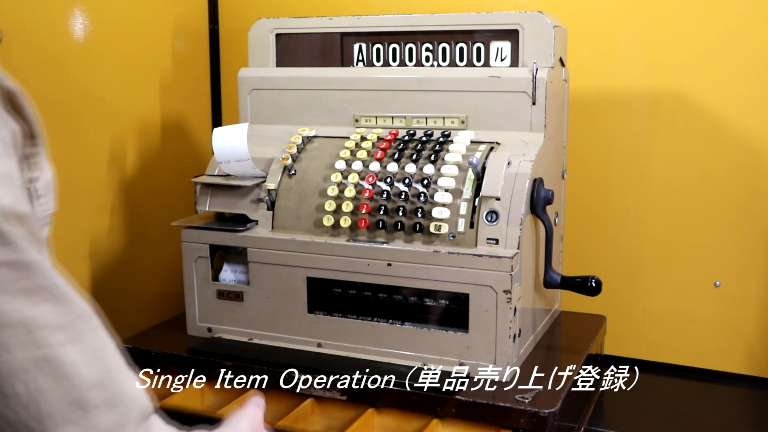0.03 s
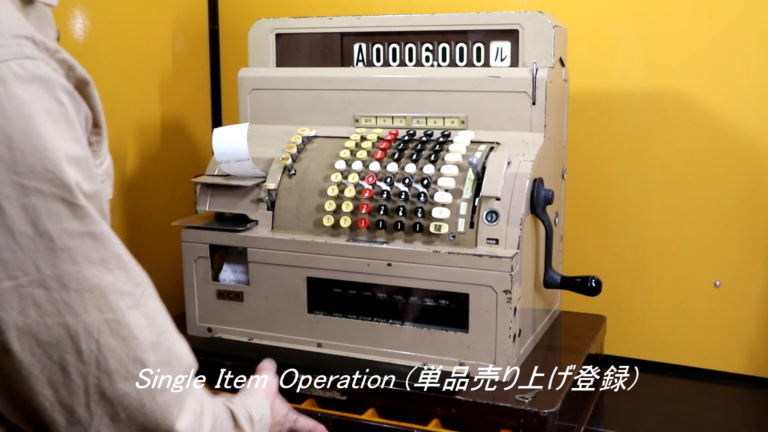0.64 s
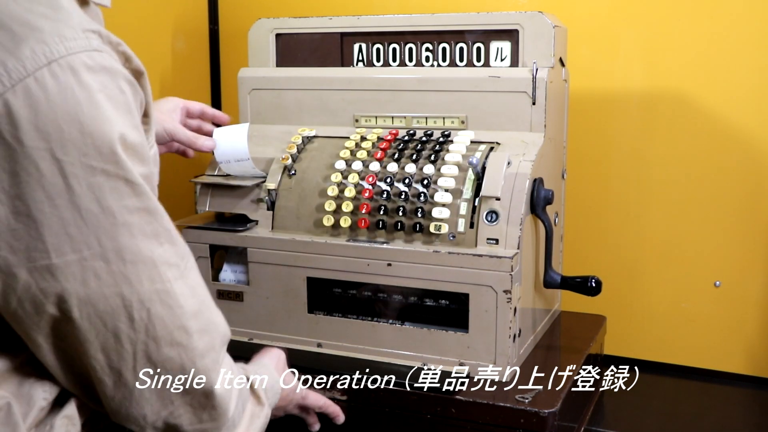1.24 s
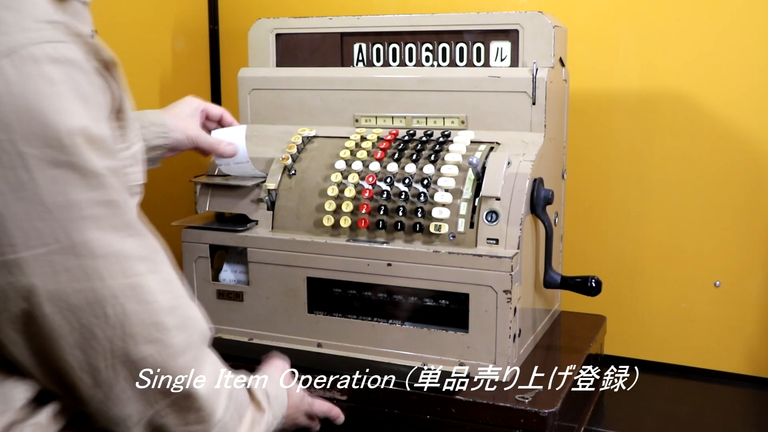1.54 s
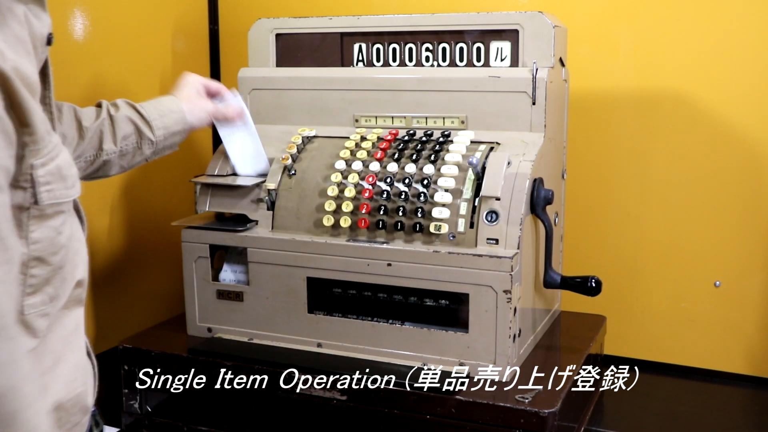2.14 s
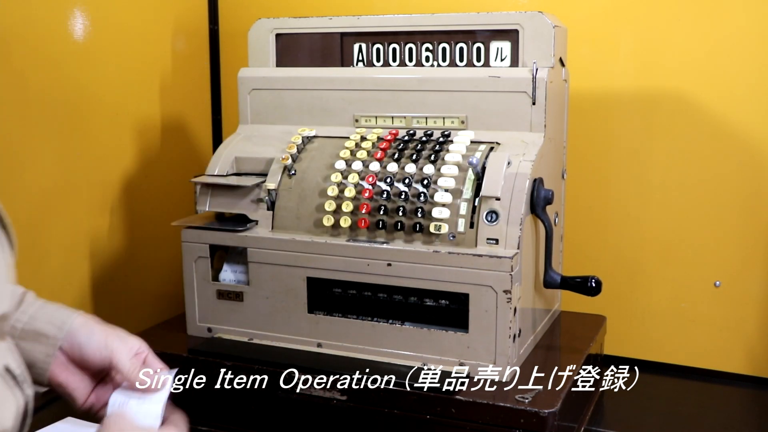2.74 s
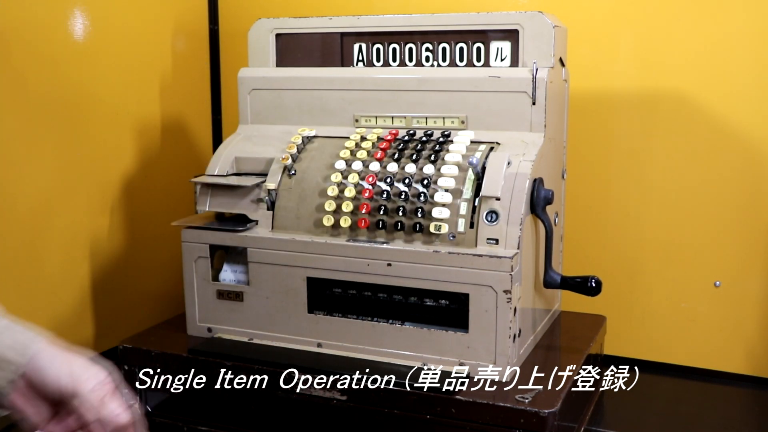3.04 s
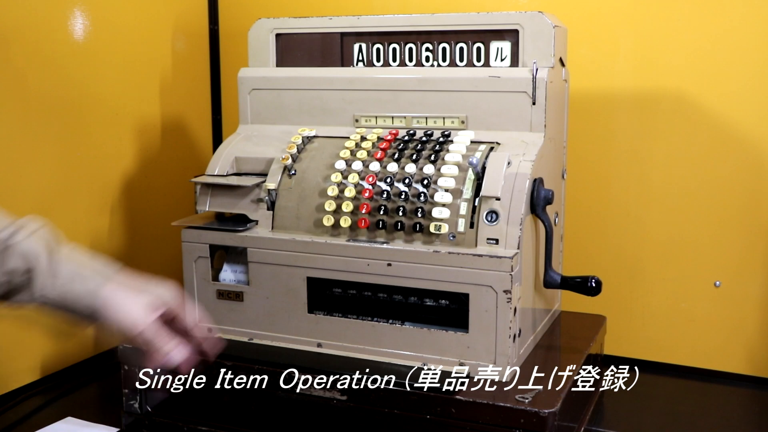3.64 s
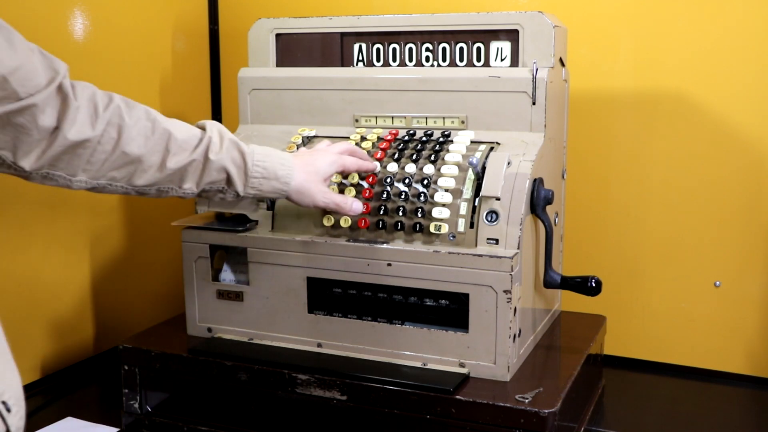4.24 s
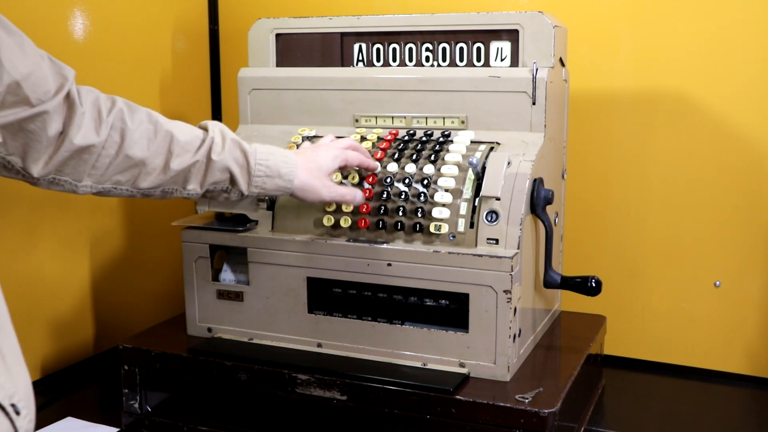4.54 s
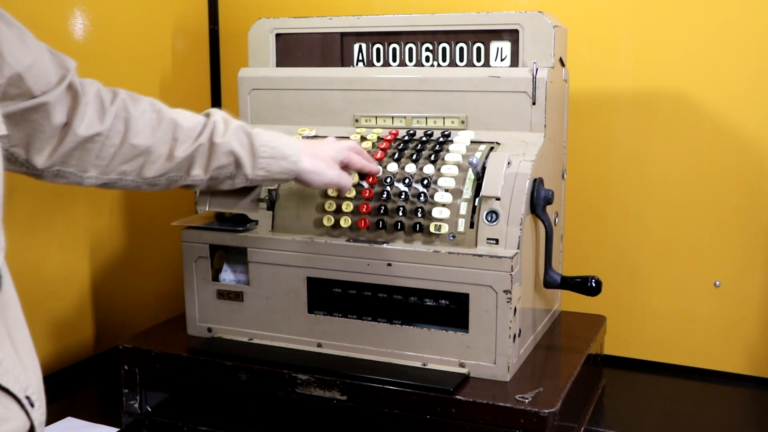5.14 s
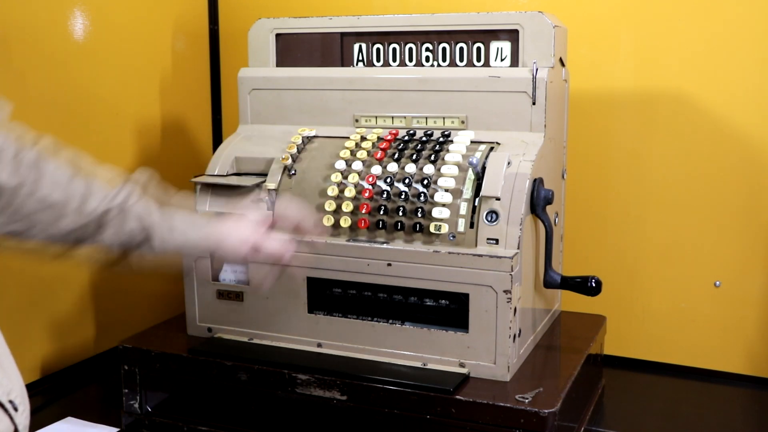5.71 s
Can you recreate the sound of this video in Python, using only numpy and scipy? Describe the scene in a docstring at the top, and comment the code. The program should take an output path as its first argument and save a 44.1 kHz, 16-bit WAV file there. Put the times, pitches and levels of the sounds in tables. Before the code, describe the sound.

A cash drawer rolls in and latches under a fading bell, followed by a quick paper tear, rustling and a few key clicks.

```python
"""A small room, one microphone close to a hand-cranked cash register. The sale bell dies away while
the cash drawer rumbles in on its rollers, catches on its pawls and latches, ringing cabinet and coin
tray. The receipt is torn off over a toothed blade and put down; a sleeve rustles and keys click in.
Behind it all lies quiet room tone, with a faint rising hum near the end."""
import sys
import numpy as np
from scipy import signal
from scipy.fft import rfft, irfft, next_fast_len
from scipy.io import wavfile
from scipy.ndimage import uniform_filter1d

SR = 44100
rng = np.random.default_rng(int(sys.argv[2]) if len(sys.argv) > 2 else 0)


def log_audio(samples):
    """Write samples as a 16-bit WAV file to the path given in sys.argv[1]."""
    # one column per channel
    frames = np.atleast_2d(samples).T
    # limit to full scale, then quantise
    limited = np.clip(frames, -1, 1)
    pcm = np.round(limited * 32767).astype(np.int16)
    wavfile.write(sys.argv[1], SR, pcm)


N = 263277
T = np.arange(N) / SR
AGE = T[:SR // 2]  # seconds since a blow

# Modes of drawer and cabinet. Each row: frequency in Hz, relative level in dB, t60 in seconds.
CABINET_MODES = [(108,-12,.35),(205,-2,.3),(286,-4,.25),(404,-4,.3),(460,-4,.16),(523,0,.16),(590,-1,.25),(645,-5,.2),(953,0,.16),(1035,1,.13),(1178,-3,.16),(1663,-1,.12),(2080,-1,.16),(2420,-2,.1),(2940,-3,.13)]
# Modes of the steel coin tray and note clips. Each row: frequency in Hz, relative dB, t60 in seconds.
TRAY_MODES = [(8400,0,.07),(9080,-5,.2),(9826,-3,.17),(12600,-6,.22),(15550,-6,.12)]
# Blows on drawer and cabinet. Each row: start in seconds, thud level in dB, thud centre in Hz,
# clang level in dB, clang centre in Hz, click level in dB.
DRAWER_KNOCKS = [(0.3645, -30, 543, -16.5, 940, -23), (.47, -25.5, 322, -18.5, 1060, -30.5),
                 (.54, -29.5, 417, -20, 1880, -35), (.7, -35, 400.6, -23.5, 940, -29.5),
                 (.763, -34.5, 448, -42.5, 1230, -34.5), (.839, -39.5, 348, -40, 1380, -36.5),
                 (1.004, -36, 520, -37.5, 1050, -54.5), (1.12, -17, 378, -21, 1460, -48),
                 (1.15, -20.5, 532, -24, 1040, -43), (1.19, -16, 459, -21, 1910, -28.5),
                 (1.2827, -26.5, 260, -10.5, 1980, -19.5), (1.539, -36.5, 298, -52, 1140, -78),
                 (1.565, -36.5, 134, -36.5, 1680, -51.5), (1.604, -34.5, 304, -44, 1330, -59),
                 (1.7, -62.5, 251.3, -37.5, 1410, -54), (5.068, -47, 138, -55, 1467, -71),
                 (5.111, -44.5, 99, -55.5, 1470, -75.5)]
def drawer_knocks():
    """Each blow sets off a thud of the box, a clang of its panels and a click that rings the coin tray."""
    light_t60_s, clamp_db = .23, -16  # ring of a light blow; the clang level that halves it
    out = np.zeros(N)
    for start, thud_db, thud_hz, clang_db, clang_hz, click_db in DRAWER_KNOCKS:
        t60 = light_t60_s / (1 + amp(clang_db - clamp_db) ** 2)  # hard blows clamp the parts together
        held = fade(AGE, 2 * t60)  # parts that stay pressed together ring shorter
        swing = 1 - np.exp(-AGE / 0.0029)  # the heavy box takes a moment to move
        panels = amp(-16) * held * ringing(CABINET_MODES, scatter_db=1)
        tray = amp(-19) * held ** 2 * ringing(TRAY_MODES, scatter_db=1)
        box = swing * (contact(0.013, -3.2, 1.6 * t60) + panels)
        thud = focus(band(box, thud_hz / 2.9, 700), thud_hz, spread=.7)
        crack = focus(band(contact(0.047, -4, t60), 830, 3500), 1400, spread=.96)
        hollow = focus(band(swing * panels, 800, 3800), clang_hz, spread=.2)
        clang = at_level(crack, -1.5) + at_level(hollow, -5.5)
        click = band(contact(0.02, -7, t60), 3500, 10550) + tray
        add(out, start, at_level(thud, thud_db) + at_level(clang, clang_db) + at_level(click, click_db))
    return out


# Runs on the rollers, then drags of a pawl. Each row: start in seconds, length in seconds, level in dB.
ROLLER_RUNS = [(0, 0.34, -32.5), (.53, 0.044, -43), (.77, .19, -47.5), (1.02, .24, -41)]
PAWL_DRAGS = [(.405, 0.11, -24.5), (.545, .035, -20.5), (.768, .022, -35), (.84, 0.023, -24.5)]
# Spectra of the rumble and the scrape. Each row: frequency in Hz, relative level in dB.
ROLLER_SPECTRUM = [(45,-32),(100,-4.5),(400,-5),(470,-12),(1000,-9.5),(1700,-23),(2500,-19.5),(4300,-38),(9000,-36),(15000,-53.5)]
PAWL_SPECTRUM = [(150,-26),(400,-11.5),(1050,1),(1650,-16.5),(2500,-5),(4400,-21.5),(9500,-22),(13000,-45)]
def drawer_slide():
    """Rollers rumble and pawls scrape; both ring the cabinet, and the scraping shakes the coin tray."""
    bumps = unit(grains(per_s=2500, scatter_db=1.6))
    slips = unit(grains(per_s=900, scatter_db=3))
    roll = colour(bumps + amp(-14.5) * resonate(bumps, CABINET_MODES), ROLLER_SPECTRUM)
    scrape = colour(slips + amp(-12.5) * resonate(slips, CABINET_MODES), PAWL_SPECTRUM)
    jingle = amp(-19.5) * resonate(slips, TRAY_MODES)
    rolling = swells(ROLLER_RUNS, attack_s=.012, release_t60=.35)
    dragging = swells(PAWL_DRAGS, attack_s=.024, release_t60=.15)
    return roll * rolling + (scrape + jingle) * dragging


# Modes of the sale bell. Each row: frequency in Hz, level in dB, t60 in seconds.
BELL_MODES = [(2089,-42,3.2),(2110,-39,4.1),(5265,-58,1.1)]
def bell():
    """The sale bell rings out; its split main mode beats."""
    return sum(amp(db) * np.sin(2 * np.pi * hz * T) * fade(T, t60) for hz, db, t60 in BELL_MODES)


# The receipt in the hand. Each row: start in seconds, thud, body and snap levels in dB, snap centre in Hz.
PAPER_SNAPS = [(1.906, -49.5, -40, -35, 5330), (1.984, -51, -37, -28.5, 8260), (2.06, -56, -37, -27, 4430),
               (2.116, -52, -36, -33.5, 5130), (2.159, -51, -37.5, -25.5, 6470),
               (2.17, -47, -45.5, -18.5, 6400), (2.785, -47, -43.5, -42.5, 4760),
               (2.836, -54, -41, -34.5, 4870), (2.87, -54, -47, -32.5, 5600),
               (2.908, -37, -40, -35.5, 5500), (3.115, -50.5, -52.5, -64, 5000),
               (3.393, -63, -48, -40, 6040), (3.411, -59, -43.5, -36.5, 5700)]
def receipt_snaps():
    """The paper snaps and taps as it is handled and put down."""
    out = np.zeros(N)
    for start, *strike in PAPER_SNAPS:
        add(out, start, snap(contact(0.0047, -1.8, 0.075), *strike))
    return out


# Spectrum of tearing paper. Each row: frequency in Hz, relative level in dB.
TEAR_SPECTRUM = [(180, -56.5), (300, -23), (870, -13.5), (1040, -1.5), (2320, -9.5), (3950, -6.5),
                 (5700, -13), (7690, -3), (16000, -21)]
def receipt_tear():
    """One quickening pull: the paper gives tooth by tooth and zips across the blade."""
    start_s, length_s, level_db = 2.165, .07, -14.5
    teeth_per_s, teeth_per_s2 = 480, 7500  # rate at the start, and its growth
    pull = swells([(start_s, length_s, level_db)], attack_s=.022, release_t60=.098)
    rate = teeth_per_s + teeth_per_s2 * np.clip(T - start_s, 0, 2 * length_s)
    travel = np.cumsum(rate * (1 + 1.1 * rng.standard_normal(N)) / SR)
    teeth_passed = np.floor(np.maximum.accumulate(travel))
    bites = np.diff(teeth_passed, prepend=0) * amp(2.8 * rng.standard_normal(N))
    rasp = unit(bites - uniform_filter1d(bites, size=200))
    fibres = amp(-2) * unit(grains(per_s=7600, scatter_db=3.8))
    return colour(rasp + fibres, TEAR_SPECTRUM) * pull


# Modes of the toothed blade. Each row: frequency in Hz, relative level in dB, t60 in seconds.
BLADE_MODES = [(4530,-14,.24),(7480,0,.16),(7870,-1,.11),(8064,-4,.16),(11550,-6,.17),(14160,-8,.17)]
# Flicks on the blade. Each row: start in seconds, level in dB.
BLADE_FLICKS = [(2.292, -35.5), (2.309, -36.5), (2.356, -46)]
def blade_flicks():
    """The paper's edge flicks the blade and leaves it ringing."""
    out = np.zeros(N)
    for start, db in BLADE_FLICKS:
        buzz = 1 + unit(band(rng.standard_normal(len(AGE)), 18, 120, order=1))  # paper brushes the steel
        steel = buzz * ringing(BLADE_MODES, scatter_db=1)
        tick = 2 * band(contact(0.013, 0, 0.04), 3800, 13000)
        add(out, start, at_level(steel + tick, db))
    return out


# Modes of a key stem in its plate. Each row: frequency in Hz, relative level in dB, t60 in seconds.
STEM_MODES = [(2150,-6,.09),(7700,4,.07),(10300,-6,.1)]
# Key presses. Each row: start in seconds, relative thud, body and click levels in dB, click centre in Hz.
KEY_PRESSES = [(4.168,-52.5,-37.5,-28,7050),(4.262,-72,-67,-41,7900),(4.843,-35.5,-29,-18.5,7600),(5.248,-52,-45,-49,4100),(5.314,-50.5,-54.5,-39,7640)]
def keys():
    """A key snaps into its catch and rebounds once."""
    out = np.zeros(N)
    for start, *strike in KEY_PRESSES:
        stem = amp(-21) * ringing(STEM_MODES, scatter_db=1)
        catch = amp(-5) * snap(contact(0.0064, -17, 0.097) + stem, *strike)
        rebound = amp(-8) * snap(contact(0.007, 9, 0.14), *strike)
        add(out, start, catch)
        add(out, start + 0.0046, rebound)
    return out


# Moves of the sleeve and loose paper. Each row: start in seconds, length in seconds, level in dB.
SLEEVE_MOVES = [(1.62, 0.051, -46.5), (1.85, .05, -50), (2.49, .06, -56.5), (2.725, 0.16, -43.5),
                (2.98, 0.25, -53), (3.27, 0.19, -59.5), (3.74, 0.071, -53.5), (4.19, 0.11, -52.5)]
# Spectrum of their rustle. Each row: frequency in Hz, relative level in dB.
RUSTLE_SPECTRUM = [(300,-10),(1200,-1.5),(3500,-8),(8500,-3),(12000,-9.5),(16000,-19.5)]
def rustle():
    """Cloth and paper slide in fine grains."""
    friction = colour(grains(per_s=6000, scatter_db=2.2), RUSTLE_SPECTRUM)
    return friction * swells(SLEEVE_MOVES, attack_s=.042, release_t60=.55)


def room(x):
    """Direct sound reaches the microphone first; near walls add a short tail, longest in the bass."""
    noise = rng.standard_normal(len(AGE)) * np.clip((AGE - .003) / 0.0044, 0, 1)
    tail = (amp(2) * band(noise, 90, 413) * fade(AGE, 0.38)
            + band(noise, 800, 3500) * fade(AGE, 0.22)
            + amp(-6.5) * band(noise, 2900, 15000) * fade(AGE, 0.23))
    return amp(-0.83) * x + amp(-34) * signal.fftconvolve(x, tail)[:N]


# The hum's two swells. Each row: start in seconds, length in seconds, level in dB.
FAINT_HUM_SWELLS = [(5.36, 0.23, -48.5), (5.72, .22, -51)]
def hum():
    """In the background a faint, wavering hum glides up and levels off."""
    low_hz, high_hz, glide_mid_s, glide_s = 168, 209, 5.5, .19
    waver = 1 + 0.22 * unit(band(rng.standard_normal(N), 3, 20, order=2))
    hz = low_hz + (high_hz - low_hz) * (1 + np.tanh((T - glide_mid_s) / glide_s)) / 2
    tone = np.sin(2 * np.pi * np.cumsum(hz) / SR)
    return waver * tone * swells(FAINT_HUM_SWELLS, attack_s=.15, release_t60=.81)


# Spectrum of the room tone. Each row: frequency in Hz, relative level in dB.
ROOM_SPECTRUM = [(15, -38), (25, -16), (64, -9), (97, -14), (206, -3), (270, -11), (405, -15), (775, -17),
                 (840, -16), (16000, -34.5)]
def room_tone():
    """Quiet, steady noise round the microphone, mostly bass."""
    return amp(-55) * colour(rng.standard_normal(N), ROOM_SPECTRUM)


def snap(x, thud_db, body_db, top_db, top_hz):
    """A small sharp contact: bright on top, with a share passed on to whatever holds it."""
    thud = band(x, 152, 530, order=2)
    body = focus(band(x, 600, 3300), 2150, spread=1)
    top = focus(band(x, 2510, 2.24 * top_hz, order=4), top_hz, spread=.42)
    sheen = amp(-24.5) * band(x, 9700, 16200)
    return at_level(thud, thud_db) + at_level(body, body_db) + at_level(top + sheen, top_db)


def contact(crack_t60, ring_db, ring_t60):
    """A brief crack, then the wash of many crowded modes."""
    return rng.standard_normal(len(AGE)) * (fade(AGE, crack_t60) + amp(ring_db) * fade(AGE, ring_t60))


def ringing(modes, scatter_db):
    """Impulse response of an object; each point of contact weights its modes differently."""
    chance = rng.standard_normal((len(modes), 2))
    return sum(np.sign(side) * amp(db + scatter_db * weight) * np.sin(2 * np.pi * hz * AGE) * fade(AGE, t60)
               for (hz, db, t60), (side, weight) in zip(modes, chance))


def resonate(force, modes):
    """A running force rings an object's modes; rms 1."""
    return unit(signal.fftconvolve(force, ringing(modes, scatter_db=2))[:N])


def grains(per_s, scatter_db):
    """Random tiny slips, a few much stronger than the rest."""
    sizes = amp(scatter_db * np.minimum(rng.exponential(size=N), 4))
    return (rng.random(N) < per_s / SR) * rng.choice([-1, 1], N) * sizes


def swells(rows, attack_s, release_t60):
    """An envelope in which each row builds up, holds and dies away."""
    return sum(amp(db) * np.clip((T - start) / attack_s, 0, 1)
               * fade(np.maximum(T - start - length, 0), release_t60) for start, length, db in rows)


def fade(t, t60):
    """Free decay, 60 dB down after t60 seconds."""
    return np.exp(-np.log(1000) * t / t60)


def colour(x, points):
    """Shape a steady sound by a spectrum of (Hz, dB) points; rms 1."""
    hz, db = np.transpose(points)
    size = next_fast_len(N, True)
    freqs = np.maximum(np.fft.rfftfreq(size, 1 / SR), 1)
    gain = amp(np.interp(np.log(freqs), np.log(hz), db))
    return unit(irfft(rfft(x, size) * gain, size)[:N])


def focus(x, hz, spread):
    """A broad resonance round hz."""
    return band(x, hz / (1 + spread), hz * (1 + spread), order=1)


def band(x, lo_hz, hi_hz, order=3):
    """Causal band-pass."""
    edges = [lo_hz, min(hi_hz, SR / 2 - 1)]
    return signal.sosfilt(signal.butter(order, edges, "band", fs=SR, output="sos"), x)


def at_level(x, db):
    """Set a blow's level by the rms of its first 20 ms."""
    return x * amp(db) / np.sqrt(np.mean(x[:SR // 50] ** 2))


def amp(db):
    """Decibels to gain."""
    return 10 ** (np.asarray(db) / 20)


def unit(x):
    """Scale to rms 1."""
    return x / np.sqrt(np.mean(x ** 2))


def add(track, start_s, sound):
    """Mix a sound in at a given time."""
    i = int(start_s * SR)
    track[i:i + len(sound)] += sound[:N - i]


def scene():
    """The register and the hand at work close by, hum and room tone behind; mono."""
    register = drawer_knocks() + drawer_slide() + bell()
    receipt = receipt_snaps() + receipt_tear() + blade_flicks()
    return (room(register + receipt + keys() + rustle()) + hum() + room_tone())[None]


def record(dry):
    """At the microphone, peaks beyond full scale clip and the treble is cut above 16 kHz."""
    lowpass = signal.ellip(8, .2, 70, 16000, fs=SR, output="sos")
    return signal.sosfilt(lowpass, np.clip(dry, -1, 1))


dry = scene()
out = record(dry)
log_audio(out)
```